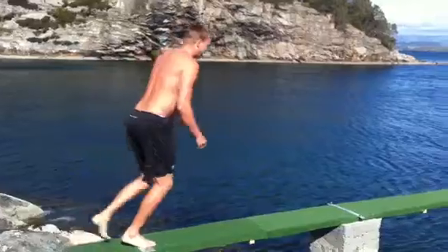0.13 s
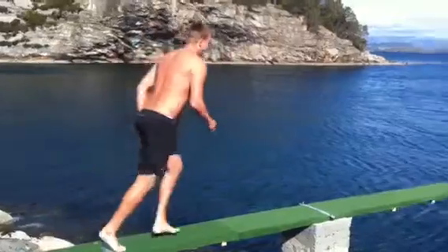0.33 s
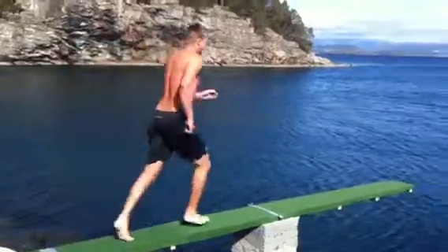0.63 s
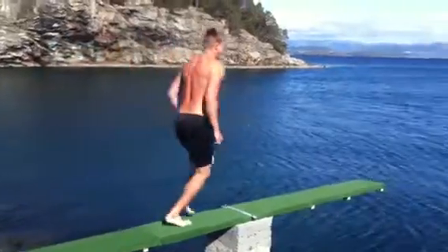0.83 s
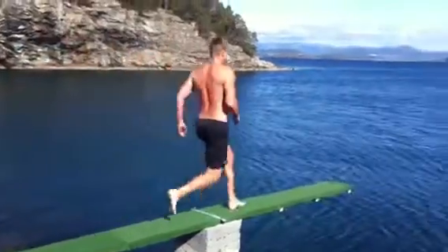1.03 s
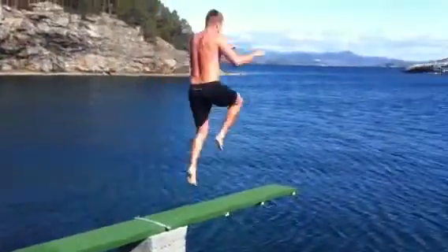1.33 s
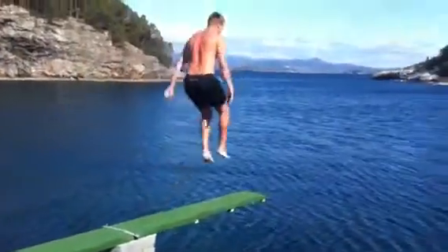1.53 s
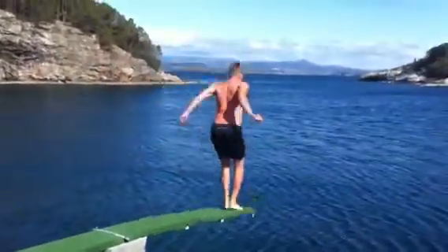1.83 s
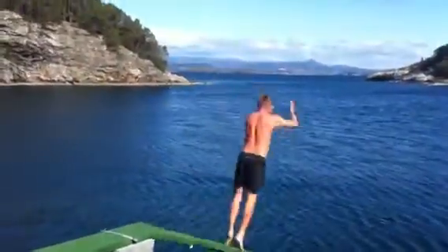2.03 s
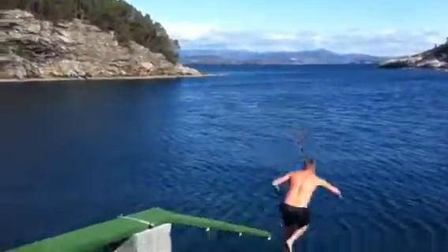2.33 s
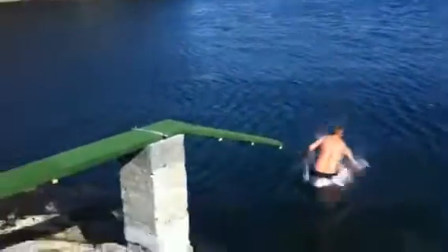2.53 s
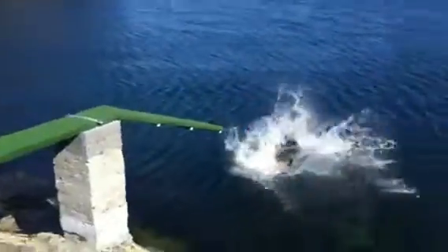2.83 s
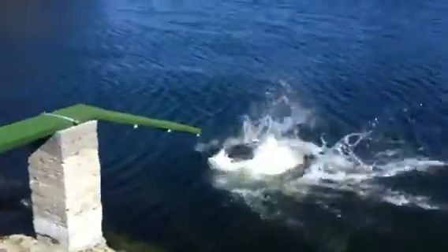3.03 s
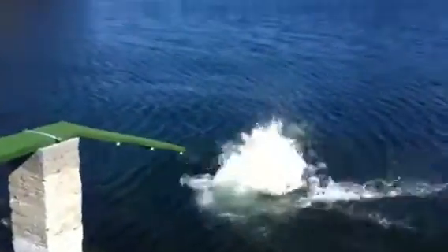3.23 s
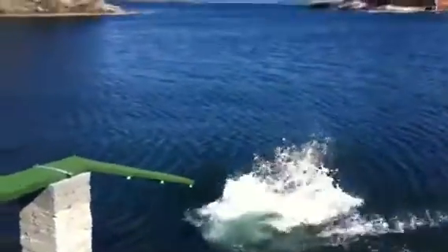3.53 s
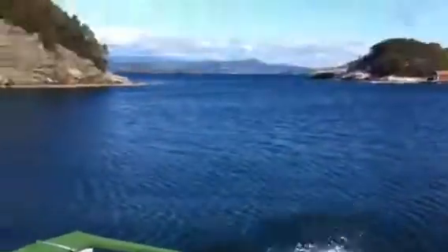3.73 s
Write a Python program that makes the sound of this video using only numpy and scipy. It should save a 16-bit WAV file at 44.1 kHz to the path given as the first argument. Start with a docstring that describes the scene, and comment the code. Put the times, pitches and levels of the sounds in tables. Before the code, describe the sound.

A big watery splash after a diving board knocks and rattles, under gusty wind on the microphone

```python
"""Dive from a board in gusty wind

On a rocky shore, gusts buffet a phone's single microphone: noisy bursts of eddies over a coloured rumble.
A bare foot taps a wooden diving board, which rattles and slaps on its mount after take-off: short rings,
thuds and cracks, then chattering noise. The diver hits the water with a tap, a little fizz and a wide hiss
of spray and drops, made of scattered grains, that throbs, perhaps as a trapped air cavity pulses.
A limiter holds the peaks.
"""
import sys
import numpy as np
from scipy import signal
from scipy.fft import rfft, irfft, next_fast_len
from scipy.io import wavfile
from scipy.ndimage import uniform_filter1d, minimum_filter1d

SR = 44100
rng = np.random.default_rng(int(sys.argv[2]) if len(sys.argv) > 2 else 0)


def gain_from_db(level_db):
    """Convert decibel levels to linear amplitude factors (20 dB per decade)."""
    decades = np.asarray(level_db, float) / 20
    return 10 ** decades


def generate_wav(signal):
    """Clip the signal to [-1, 1] and save it as 16-bit WAV at the path in sys.argv[1]."""
    frames = np.transpose(np.atleast_2d(signal))
    scaled = np.clip(frames, -1, 1) * 32767
    pcm = np.round(scaled).astype(np.int16)
    wavfile.write(sys.argv[1], SR, pcm)


N = 171549  # length in samples
TIME = np.arange(N) / SR  # seconds


def curve(table, column):
    """A column of a table, drawn as straight lines between its times."""
    a = np.array(table, float)
    return np.interp(TIME, a[:, 0], a[:, column])


def unit(x):
    """Scale to rms 1."""
    return x / np.sqrt(np.mean(x ** 2))


def band(x, lo, hi):
    """Keep only the frequencies from lo to hi, in Hz."""
    n = next_fast_len(N)
    f = np.arange(n // 2 + 1) * SR / n
    return irfft(rfft(x, n) * ((f >= lo) & (f < hi)), n)[:N]


def colour(x, table, lo=20., hi=20000.):
    """Minimum-phase filter that follows a table of Hz and dB, scaled to level 1 in the band lo-hi Hz."""
    a = np.array(table, float)
    f = np.maximum(np.arange(4097) * SR / 8192, 1)
    log_gain = np.interp(np.log(f), np.log(a[:, 0]), a[:, 1]) * np.log(10) / 20
    # Folding the cepstrum onto positive time makes the response minimum-phase
    cepstrum = irfft(log_gain)
    cepstrum[1:4096] *= 2
    cepstrum[4097:] = 0
    impulse = irfft(np.exp(rfft(cepstrum)))[:4096]
    y = signal.fftconvolve(x, impulse)[:N]
    return y / np.std(band(y, lo, hi))


def walk(rate):
    """Random levels held for 1 / rate seconds and smoothed twice; spread near 1."""
    k = int(SR / rate)
    held = np.repeat(rng.standard_normal(N // 100), k)[:N]
    return 1.3 * uniform_filter1d(uniform_filter1d(held, k), k)


def grains(per_s, spread_db, smear_s, bed):
    """Scattered bursts of uneven size with short noisy tails over a bed of noise; also their envelope."""
    chance, size = rng.random((2, N))
    size_db = np.minimum(-spread_db * np.log(size + 1e-9), 3 * spread_db)
    hits = (chance < per_s / SR) * gain_from_db(size_db)
    env = signal.lfilter([1], [1, -np.exp(-1 / (SR * smear_s))], hits)
    bursts = unit(env * rng.standard_normal(N)) + bed * rng.standard_normal(N)
    return bursts, unit(env)


# Spray thrown up by the diver. Each row: time in seconds, level of the low spray in dB, of the high in dB.
SPLASH_LEVELS = [(2.7, -41, -62.5), (2.716, -34, -50), (2.736, -30.5, -27), (2.974, -25.5, -22.5),
                 (3.1, -28, -26), (3.12, -23.5, -23.5), (3.434, -22, -27), (3.64, -34.5, -36.5),
                 (3.648, -36.5, -40), (3.73, -30.5, -37), (3.82, -38, -44.5), (3.866, -38, -38),
                 (3.89, -37, -39)]
# Tone of the spray at the microphone. Each row: frequency in Hz, relative density in dB per Hz.
SPRAY_COLOUR = [(600, -27), (1000, -13), (1500, -8.5), (2260, -2), (3090, -7.5), (3760, -5.5), (5500, -8.5),
                (6500, -12), (7200, -28), (7900, -11), (9890, -7), (11600, -12), (13400, -4), (15500, -13)]
# Throb of the spray, perhaps from a pulsing air cavity. Each row: time in seconds, mean beats per second,
# nominal depth in dB.
THROB = [(3.1, 100, 0), (3.2, 100, 7), (3.29, 97, 16), (3.32, 85, 16), (3.45, 83, 15), (3.55, 79, 11),
         (3.75, 73, 10), (3.8, 72, 2)]
SPLIT_HZ = 7200  # low spray below, high spray above
THROB_PHASE_RAD, TREBLE_LAG_RAD = 0.13, 0.74


def splash():
    """Dense grains of spray and drops in two bands; both throb, the high band a little late."""
    drops, _ = grains(1500, spread_db=5.0, smear_s=0.00031, bed=1.12)
    spray = colour(drops, SPRAY_COLOUR)
    beats_per_s = curve(THROB, 1) * (TIME > THROB[0][0]) * (1 + 0.0076 * walk(30))
    phase = 2 * np.pi * np.cumsum(beats_per_s) / SR + THROB_PHASE_RAD
    depth = curve(THROB, 2) * gain_from_db(1.0 * walk(48))
    out = 0
    # Each band: low edge in Hz, high edge in Hz, lag in radians, share of the nominal depth, level column
    bands = [(0, SPLIT_HZ, 0, .5, 1), (SPLIT_HZ, SR, TREBLE_LAG_RAD, .552, 2)]
    for lo, hi, lag, share, column in bands:
        part = band(spray, lo, hi)
        part = part / np.std(band(part, 2500, 15500))
        swing = np.sin(phase - lag) + 0.63 * np.sin(phase - lag + np.pi / 2)
        beat = gain_from_db(depth * swing * share)
        # Dividing by its running rms leaves the beat without a slow change of level
        beat = beat / np.sqrt(np.abs(uniform_filter1d(beat ** 2, size=2000)))
        out = out + part * beat * gain_from_db(curve(SPLASH_LEVELS, column) + 1.4 * walk(20))
    return out * (TIME > SPLASH_LEVELS[0][0])


# Knocks of the foot and the board, and the tap on the water. Each row: start in seconds, ring level in dB
# before its decay, nominal ring pitch in Hz, time to fall 60 dB in seconds, crack level in dB and
# thud level in dB, these two relative to the ring.
KNOCKS = [(.357, -28.5, 4260, 0.033, -28.5, -21), (2.029, -25.5, 5200, 0.022, -7.5, -10),
          (2.048, -21.5, 3020, 0.021, -7, 7), (2.08, -12, 3300, 0.032, -15.5, 4),
          (2.104, -20.5, 3460, 0.035, -14, 9), (2.193, -14.5, 4830, 0.0194, -18.5, -14),
          (2.364, -27.5, 4350, 0.018, -21, -20), (2.593, -27, 3460, 0.011, 0, -20),
          (2.703, -14.5, 2780, 0.013, -21.5, -20)]


def knocks():
    """Each knock: a short noisy ring, a duller thud of the plank and a broad crack."""
    out = np.zeros(N)
    t = np.arange(SR // 10) / SR
    for start, db, hz, t60, crack_db, thud_db in KNOCKS:
        noise = rng.standard_normal((3, len(t)))
        ring_filter = signal.butter(2, [hz * 0.73, hz * 1.14], "band", fs=SR)
        ring = unit(signal.lfilter(*ring_filter, noise[0]))
        crack = np.diff(noise[1], prepend=0) * np.exp(-t / 0.0039)
        thud_filter = signal.butter(2, [457.8, 1308], "band", fs=SR)
        thud = unit(signal.lfilter(*thud_filter, noise[2]))
        decay = np.exp(-np.log(1000) * t / t60)
        attack = np.minimum(t / 0.00036, 1)
        knock = ((ring + gain_from_db(thud_db) * thud) * decay + gain_from_db(crack_db) * crack) * attack
        i = int(start * SR)
        out[i:i + len(t)] += gain_from_db(db) * knock
    return out


# Rattle of the loose board. Each row: time in seconds, level in dB relative to RATTLE_DB.
RATTLE = [(2.0, -78), (2.012, -56.5), (2.026, -38), (2.086, -25.5), (2.154, -33.5), (2.184, -44),
          (2.192, -35.5), (2.23, -43.5), (2.324, -41), (2.356, -54), (2.362, -44), (2.412, -61),
          (2.43, -43.5), (2.534, -44), (2.58, -90)]
# Tone of the board at the microphone. Each row: frequency in Hz, relative density in dB per Hz.
BOARD_COLOUR = [(650, -20.5), (1000, 5), (1600, -12), (1930, -24), (2400, -0.5), (2670, -2), (3480, 0),
                (3950, -3), (4570, -5.5), (5340, -4.5), (7230, -14), (12100, -26), (15500, -32.5)]
RATTLE_DB = 1.5


def board():
    """The loose plank chatters on its mount, roughest when loudest, over a steadier hiss."""
    chatter, _ = grains(700, spread_db=4.5, smear_s=.0012, bed=0)
    level_db = curve(RATTLE, 1)
    rough = np.clip((level_db + 48.0) / 20., .25, 1)
    on = (TIME > RATTLE[0][0]) & (TIME < RATTLE[-1][0])
    rattle = colour(rough * chatter + .7 * rng.standard_normal(N), BOARD_COLOUR, 3000., 6500.)
    return rattle * gain_from_db(level_db + RATTLE_DB) * on


# Fizz where the feet cut the surface. Each row: time in seconds, level in dB.
FIZZ = [(2.575, -103), (2.582, -43), (2.6, -52.5), (2.64, -54), (2.715, -51)]
# Tone of the fizz at the microphone. Each row: frequency in Hz, relative density in dB per Hz.
FIZZ_COLOUR = [(1470, 2), (2500, -4), (3120, 0.5), (5360, -10), (9010, -7.5), (15500, -30.5)]


def fizz():
    """Fine hiss as the feet go in: very short, dense grains over noise."""
    drops, _ = grains(2200, spread_db=8.0, smear_s=.0004, bed=1.7)
    on = (TIME > FIZZ[0][0]) & (TIME < FIZZ[-1][0])
    return colour(drops, FIZZ_COLOUR, 9540.0, 15500.) * gain_from_db(curve(FIZZ, 1)) * on


# Gusts over the microphone. Each row: time in seconds, rumble level in dB, flutter drive in dB.
GUSTS = [(0.0, -14, -25.5), (0.02, -19.5, -41.5), (0.11, -14, -36.5), (0.18, -11, -36.5),
         (0.25, -27.5, -45.5), (0.28, -13.5, -33.5), (0.41, -15.5, -34), (0.66, -10.5, -20.5),
         (0.69, -17.5, -35.5), (0.82, -10.5, -15.5), (0.86, -23, -26.5), (0.91, -23, -25),
         (0.99, -14.5, -15.5), (1.29, -16, -28), (1.79, -13, -19), (1.93, -22, -34), (2.13, -20.5, -32.5),
         (2.39, -14, -21), (2.41, -17, -26), (2.5, -12, -20), (2.82, -17, -27.5), (2.96, -12.5, -23.5),
         (3.26, -27, -41), (3.51, -10.5, -23), (3.57, -18.5, -26), (3.77, -23, -33), (3.8, -18.5, -25.5),
         (3.89, -25, -35)]
# Tone of the rumble. Each row: frequency in Hz, relative density in dB per Hz.
RUMBLE_COLOUR = [(20, -48.5), (40, -45), (76, -22), (130, -3.5), (166, 1), (300, -1.5), (450, -6.5),
                 (700, -13.5), (1200, -25.5), (2500, -69), (6000, -92)]
# Tone of the flutter. Each row: frequency in Hz, relative density in dB per Hz.
FLUTTER_COLOUR = [(50, -50), (100, -6), (200, -5.5), (400, -2), (700, -2), (1200, -7), (2300, -20.5),
                  (3800, -38), (6000, -59), (8000, -68.5), (15500, -107)]
# Strongest eddies on the port. Each row: start in seconds, peak of the driving envelope in dB.
BUFFETS = [(0.072, -18.5), (0.138, -19), (0.273, -18.5), (0.304, -18.5), (0.383, -18), (0.501, -12),
           (0.579, -10.5), (0.679, -7), (0.712, -17), (0.746, -9.5), (0.764, -12.5), (0.796, -11),
           (0.813, -4.5), (0.824, -8), (0.925, -5.5), (0.974, -15.5), (1.145, -12.5), (1.191, -12.5),
           (1.564, -13), (1.635, -14.5), (1.754, -14.5), (2.333, -17), (2.387, -9.5), (2.455, -12),
           (2.495, -13.5)]
EDDIES_PER_S, EDDY_SPREAD_DB, EDDY_S = 450, 4.8, .0006
BUFFET_S, BUFFET_SNAP = 0.0039, 4.2  # decay in seconds, weight of the sudden pressure step


def wind():
    """Eddies burst on the microphone port: bright flutter on each, and a rumble that they push along."""
    bursts, puffs = grains(EDDIES_PER_S, EDDY_SPREAD_DB, EDDY_S, bed=.22)
    shake = walk(30.22)
    push = unit(rng.standard_normal(N) * gain_from_db(1.5 * walk(60)) + 0.44 * bursts)
    rumble = colour(push * gain_from_db(.6 * shake), RUMBLE_COLOUR, 100., 500.) * gain_from_db(curve(GUSTS, 1))
    snaps = 1.4 * np.diff(puffs, prepend=0)
    eddies = unit((bursts + snaps) * gain_from_db(2.48 * shake)) * gain_from_db(curve(GUSTS, 2))
    strong = sum(gain_from_db(db) * (TIME >= s) * np.exp(-np.abs(TIME - s) / BUFFET_S) for s, db in BUFFETS)
    drive = eddies + strong * rng.standard_normal(N) + BUFFET_SNAP * np.diff(strong, prepend=0)
    flutter = np.std(drive) * colour(drive, FLUTTER_COLOUR, 700., 1800.)
    return rumble + flutter


# Low thumps on the microphone port. Each row: centre in seconds, envelope peak in dB.
THUMPS = [(.82, -18), (1.82, -19), (2.72, -28), (3.5, -20)]
THUMP_HZ, THUMP_S = 45, .01


def thumps():
    """Single slow pushes of air: a low sine under a bell-shaped envelope."""
    out = np.zeros(N)
    for centre, db in THUMPS:
        t = TIME - centre
        out += gain_from_db(db) * np.exp(-(t / THUMP_S) ** 2) * np.sin(2 * np.pi * THUMP_HZ * t)
    return out


# Tone of the background hiss. Each row: frequency in Hz, relative density in dB per Hz.
HISS_COLOUR = [(1000, -10), (3000, 0), (5500, 2), (7500, -10), (11500, -12), (13000, -5), (15500, -10)]
HISS_DB = -70  # mean level


def hiss():
    """Faint coloured noise whose level wavers."""
    return gain_from_db(HISS_DB + 3.7 * walk(19.0)) * colour(rng.standard_normal(N), HISS_COLOUR)


def scene():
    """All sources reach one microphone, heard alike on both channels."""
    background = hiss()
    mono = wind() + board() + knocks() + fizz() + splash() + background + thumps()
    return np.array([mono, mono])


def low_pass(x):
    """Removes everything above the highest recorded frequency."""
    return signal.sosfilt(signal.butter(12, 15770, fs=SR, output="sos"), x)


CEILING, LIMIT_S = .62, .004  # limiter ceiling (full scale is 1), its window in seconds
LOW_CUT_HZ, TOP_HZ = 115, 15700


def record(dry):
    """A quick limiter holds the peaks, then the lowest and highest frequencies are cut."""
    k = int(LIMIT_S * SR)
    gain = minimum_filter1d(np.minimum(1, CEILING / (np.abs(dry) + 1e-9)), k)
    held = dry * uniform_filter1d(uniform_filter1d(gain, k // 2), k // 2)
    low_cut = signal.butter(1, LOW_CUT_HZ, "high", fs=SR, output="sos")
    high_cut = signal.ellip(10, .2, 70, TOP_HZ, fs=SR, output="sos")
    mix = signal.sosfilt(high_cut, signal.sosfilt(low_cut, held))
    return low_pass(mix)


dry = scene()
out = record(dry)
generate_wav(out)
```